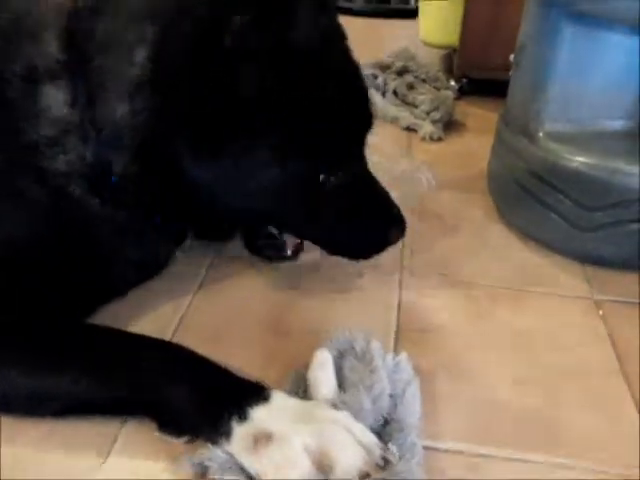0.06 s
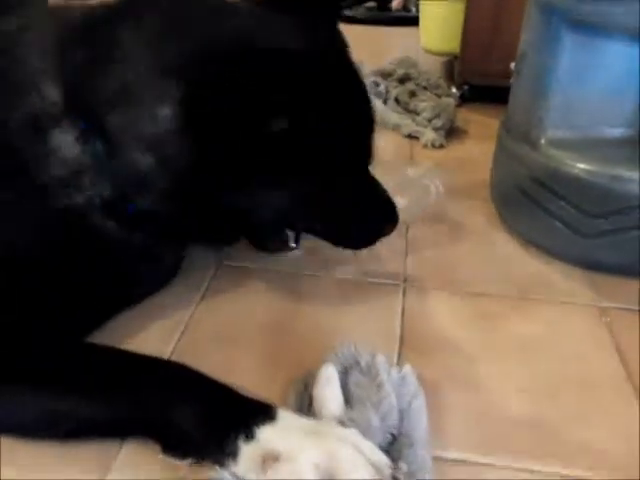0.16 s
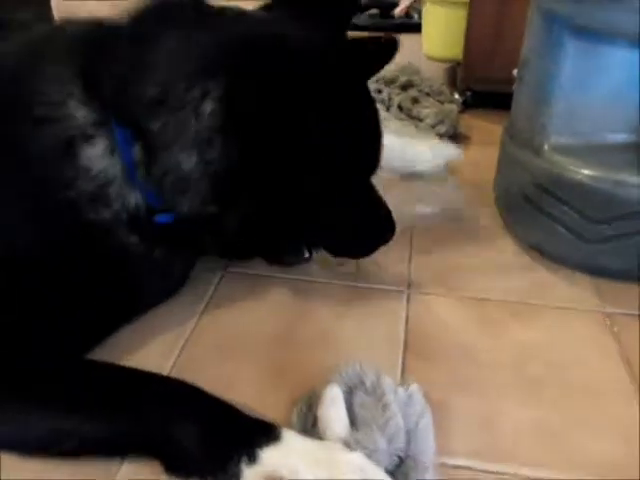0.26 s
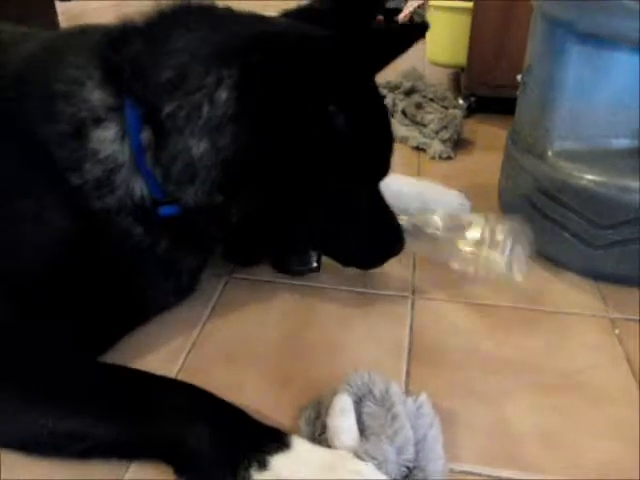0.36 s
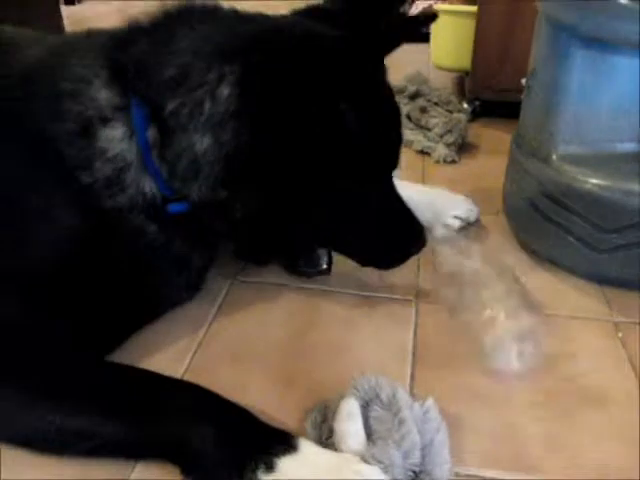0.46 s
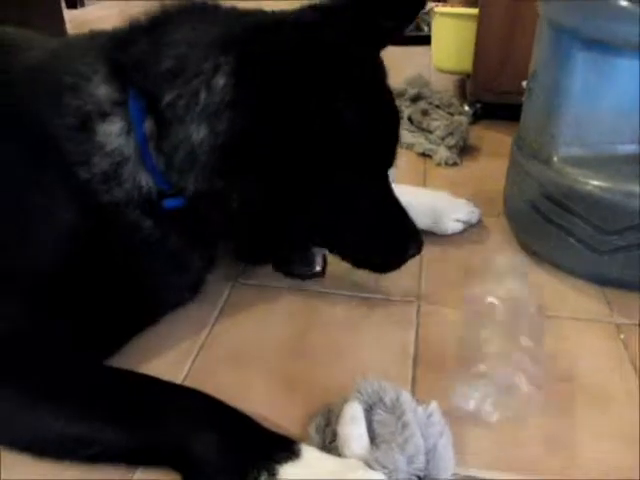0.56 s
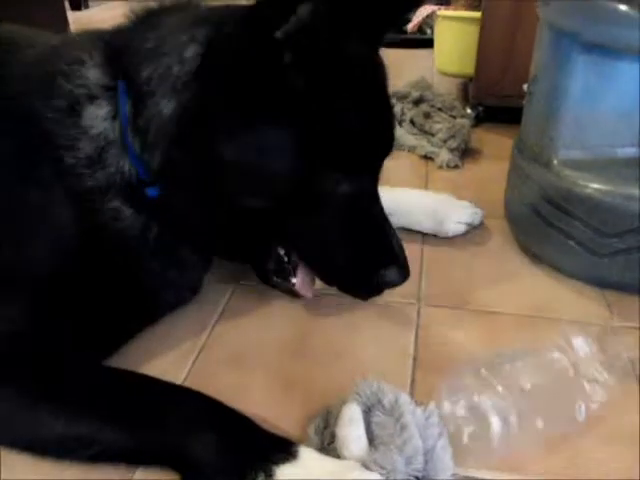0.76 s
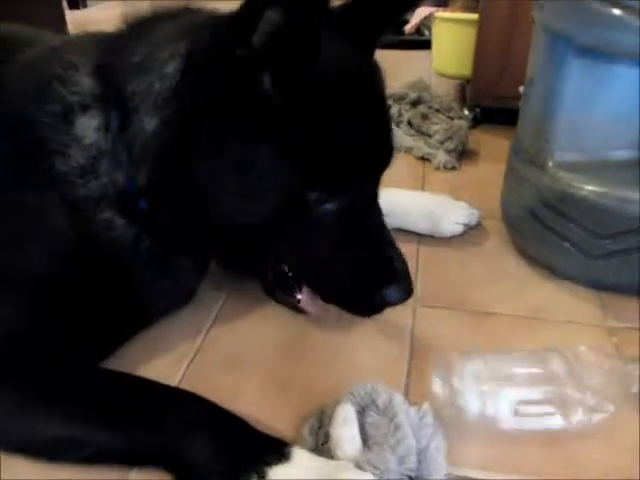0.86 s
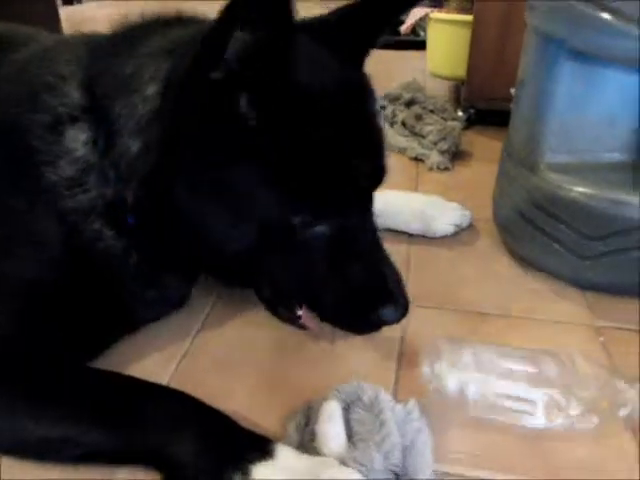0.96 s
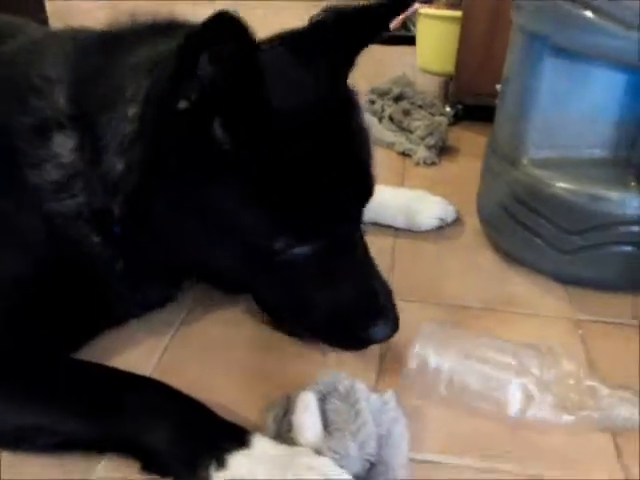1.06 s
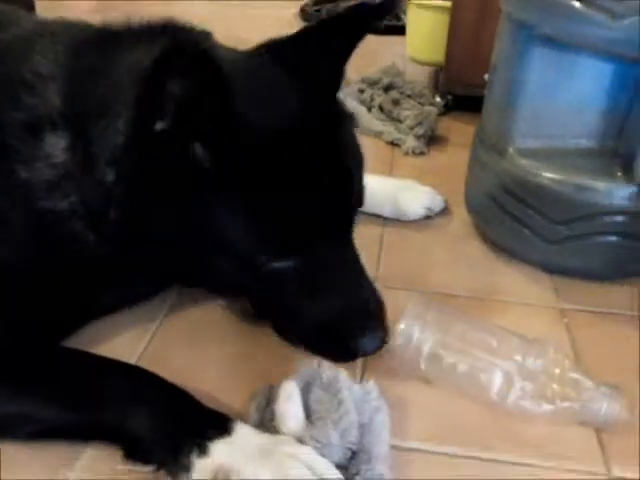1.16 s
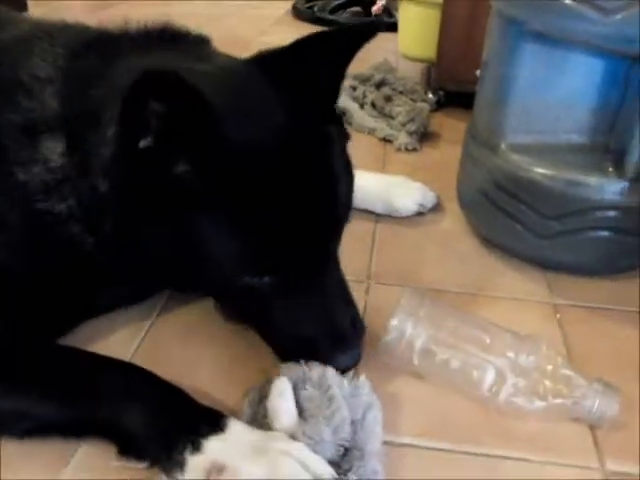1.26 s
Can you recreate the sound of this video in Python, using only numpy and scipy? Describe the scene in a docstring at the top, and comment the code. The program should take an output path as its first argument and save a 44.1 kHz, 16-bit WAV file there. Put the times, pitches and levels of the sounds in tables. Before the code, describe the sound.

A hollow plastic bottle clatters across a tiled floor with crinkly bounces, then settles.

```python
"""An empty plastic bottle slips from a dog's jaws, bounces end over end on tiles and rattles to rest.
Each bounce thuds, rings the thin wall and sets the air inside humming.
The plastic rustles through the teeth, crinkles between bounces and squeaks where it rubs.
A small hard room echoes it over a quiet hiss."""
import sys
import numpy as np
from scipy import signal
from scipy.io import wavfile
from scipy.ndimage import uniform_filter1d

SR = 44100
rng = np.random.default_rng(int(sys.argv[2]) if len(sys.argv) > 2 else 0)


def store_pcm(level_fs):
    """Save levels as 16-bit WAV."""
    pcm = np.round(np.clip(level_fs, -1, 1) * 32767).astype(np.int16)
    wavfile.write(sys.argv[1], SR, np.atleast_2d(pcm).T)


N = 57330
T = np.arange(N) / SR
HIT_T = T[:SR // 8]   # the time axis of one short hit
EDGES_HZ = np.geomspace(28, 18000, 29)
BANDS_HZ = np.sqrt(EDGES_HZ[1:] * EDGES_HZ[:-1])

# Table levels are relative. A fade_s is the time a sound takes to drop by 60 dB.
# The bottle's hits on the floor:
# start_s, thud_db, wall_db, crack_db, tick_db, panel_hz, panel_db, air_db
BOUNCES = [(0.2184, -20, -4.5, -12, -8, 1524, 3, -48), (0.28, -21.5, -14.5, -18.5, -31, 1740, -6.5, -32.5),
           (0.3212, -31, -15.5, -27.5, -33, 1350, -17, -53), (.3422, -26.5, -15, -17, -25.5, 1055, -8, -45),
           (.3790, -21, -15.5, -28, -53, 1340, -20, -25.5), (0.4419, -20, -13, -19.5, -20, 1607, -14, -28),
           (0.514, -27, -26.5, -12, -27.5, 1130, -15, -56),
           (0.5734, -20, -12.5, -15, -29.5, 1280, -33, -23), (0.605, -52, -25, -24, -24.5, 2200, -8, -53),
           (0.642, -22, -24.5, -5, -18.5, 2920, -14.5, -29.5),
           (.7140, -38.5, -32, -20.5, -30.5, 1067, -34, -24.5),
           (0.758, -26, -27, -31, -39, 1724, -20.5, -36), (.7780, -58, -19.5, -24, -35, 1280, -34, -45),
           (0.8167, -46, -20, -20.5, -40.5, 1370, -20.5, -28),
           (.8695, -45, -50, -48, -64, 1320, -25.5, -26.5),
           (0.8937, -35.5, -34, -24, -44.5, 1287, -19.5, -41),
           (1.082, -54, -42.5, -40, -52, 3460, -62, -41.5)]
# The centres of a hit's four pitch zones: thud_hz, wall_hz, crack_hz, tick_hz
ZONES_HZ = [400, 1400, 3800, 7500]
# How long the wall crackles: pitch_hz, fade_s
CRACKLE_FADES = [(200, 0.04), (1200, 0.056), (3500, 0.025), (12000, .015)]


def from_db(db):
    """Turn decibels into a gain."""
    return 10 ** (np.asarray(db) / 20)


def rms_one(x):
    """Scale a signal to an average strength (rms) of 1."""
    return x / np.sqrt(np.mean(x ** 2) + 1e-20)


def at_hz(points, hz):
    """Read between the rows of a table, on a scale of octaves."""
    pitches, values = np.transpose(points)
    return np.interp(np.log(hz), np.log(pitches), values)


def fade(t, fade_s):
    """Die away by 60 dB every fade_s."""
    return np.exp(-np.log(1000) * t / max(fade_s, 1e-3))


def swell(t, rise_s):
    """Rise softly from 0 towards 1."""
    return 1 - np.exp(-t / max(rise_s, 1e-5))


def add(out, start_s, sound):
    """Mix a sound in at its start time."""
    i = max(int(start_s * SR), 0)
    out[i:i + len(sound)] += sound[:N - i]


def noise_bands():
    """Separate noises, each a third of an octave wide and equally strong."""
    bands = []
    for edges in zip(EDGES_HZ, EDGES_HZ[1:]):
        band_pass = signal.butter(2, edges, "band", fs=SR, output="sos")
        band = signal.sosfilt(band_pass, rng.standard_normal(N + SR // 4))
        bands.append(rms_one(band[-N:]))
    return np.array(bands)


def background():
    """A quiet, steady hiss."""
    # The hiss in each band: pitch_hz, level_db
    hiss_levels = [(30, -77), (100, -78), (240, -71), (500, -59), (1000, -71), (2200, -73.5), (4500, -74.5),
                   (6600, -66), (9000, -79.5), (15000, -76)]
    return from_db(at_hz(hiss_levels, BANDS_HZ)) @ noise_bands()


def room_echo(sound, rise_s=0.0041):
    """Reflections from hard walls blur into a tail whose highest treble dies first."""
    # The strength of the echo: pitch_hz, level_db
    echo_levels = [(150, -18), (350, -5.5), (700, -8.5), (1200, -6.5), (2000, -13), (4000, -17.5),
                   (7000, -10.5), (15000, -9.5)]
    # The length of the echo: pitch_hz, fade_s
    echo_fades = [(200, 0.2), (1000, 0.36), (4000, .45), (14000, 0.12)]
    response = 0
    for band, hz, width_hz in zip(noise_bands(), BANDS_HZ, np.diff(EDGES_HZ)):
        tail = rms_one(band * swell(T, rise_s) * fade(T, at_hz(echo_fades, hz)))
        response += tail * np.sqrt(2 * width_hz / SR / N) * from_db(at_hz(echo_levels, hz))
    return signal.fftconvolve(sound, response)[:N]


def squeaks(wobble_per_khz=0.024):
    """Sliding plastic makes short wavering tones; higher ones are rougher."""
    # The rubs: start_s, length_s, start_hz, end_hz, level_db
    rubs = [(0.183, 0.028, 2017, 1737, -30), (.922, 0.053, 548.6, 531, -32.5)]
    out = np.zeros(N)
    for start_s, length_s, start_hz, end_hz, db in rubs:
        n = int(length_s * SR)
        wobble = rms_one(uniform_filter1d(rng.standard_normal(N), size=60))[:n]
        hz = np.linspace(start_hz, end_hz, n) * (1 + wobble_per_khz * start_hz / 1e3 * wobble)
        tone = np.sin(2 * np.pi * np.cumsum(hz) / SR)
        add(out, start_s, from_db(db) * signal.windows.tukey(n) * tone)
    return out


def light_touches(noise, levels, colour, touches_per_s=250):
    """Random taps on the wall, each dying like a small bounce."""
    taps = (rng.random(N) < touches_per_s / SR) * rng.exponential(1, N)
    out = 0
    for band, hz in zip(noise, BANDS_HZ):
        kept_per_sample = fade(2 / SR, at_hz(CRACKLE_FADES, hz))
        energy = signal.lfilter([1], [1, -kept_per_sample], taps + 1e-18)
        out += band * rms_one(np.sqrt(energy)) * from_db(at_hz(colour, hz))
    return out * from_db(np.interp(T, *np.transpose(levels)))


def rustle(noise):
    """The bottle brushes the dog's teeth as it slips out."""
    # The course of the slip: time_s, level_db
    slip_levels = [(0, -36), (.03, -45), (.08, -38.5), (.13, -63), (.16, -66), (.22, -45.5), (.26, -100)]
    # Its tone colour: pitch_hz, level_db
    slip_colour = [(120, -8.5), (220, -21.5), (450, 1), (650, -8.5), (1100, -8.5), (1600, -1), (2600, -12),
                   (3900, -3.5), (6600, -6.5), (15000, -29.5)]
    return light_touches(noise, slip_levels, slip_colour)


def rattle(noise):
    """The bottle scuffs and rocks on the tiles."""
    # The course of the rattle: time_s, level_db
    rattle_levels = [(.22, -37.5), (0.253, -21.5), (.33, -32), (.55, -37), (.70, -33.5), (.80, -33.5),
                     (0.931, -30), (1.0, -47.5), (1.3, -66)]
    # Its tone colour: pitch_hz, level_db
    rattle_colour = [(130, -43), (230, -11.5), (420, -16), (650, -32.5), (1100, -11), (1600, -13),
                     (2200, -13), (2800, -8), (3800, -15), (6600, -24.5), (9000, -48.5), (15000, -42.5)]
    return light_touches(noise, rattle_levels, rattle_colour)


def long_ring(hz, fade_s, blows, rise_s=0.0025, flutter=0.15, flutter_s=0.05):
    """A slightly fluttering tone that gains energy from each blow (start_s, level_db)."""
    energy = np.zeros(N)
    for start_s, db in blows:
        add(energy, start_s, (from_db(db) * swell(T, rise_s) * fade(T, fade_s)) ** 2)
    window = np.hanning(int(flutter_s * SR))
    level_drift, phase_drift = (flutter * rms_one(signal.fftconvolve(white, window, "same"))
                                for white in rng.standard_normal((2, N)))
    phase = 2 * np.pi * np.cumsum(hz * np.ones(N)) / SR
    return np.sqrt(energy) * ((1 + level_drift) * np.sin(phase) + phase_drift * np.cos(phase))


def air_hum(start_hz=211.6, climb_hz_per_s=20):
    """Each bounce sets the air in the bottle humming through its neck."""
    blows = [(0, -34.5)] + [(start_s, air_db) for start_s, *_, air_db in BOUNCES]
    return from_db(-0.5) * long_ring(start_hz + climb_hz_per_s * T, fade_s=0.42, blows=blows)


def low_rings():
    """Blows on the wall feed long low tones, already sounding from the jaws at the start."""
    # The low tones of bottle and room: pitch_hz, level_db, fade_s
    low_tones = [(398.2, -14.5, 0.47), (487.6, -23, 0.63), (525.3, -16, 0.16), (718, -22.5, 0.44),
                 (758, -26.5, 0.55)]
    blows = [(0, -15)] + [(start_s, wall_db) for start_s, _, wall_db, *_ in BOUNCES]
    return sum(from_db(db) * long_ring(hz, fade_s, blows) for hz, db, fade_s in low_tones)


def crackle(noise, colour, hold_s=0.0015, rise_cycles=1.5):
    """The thin wall's many short tones blur into a burst: a brief hold, then the treble dies first."""
    # The crackle in each band: pitch_hz, level_db
    crackle_levels = [(130, -29), (300, -13.5), (620, -22.5), (1100, -15.5), (2000, -11.5), (2700, -10.5),
                      (4000, -5.5), (6600, -5.5), (9000, -22), (15000, -28)]
    offset = rng.integers(N - len(HIT_T))
    after_hold = np.maximum(HIT_T - hold_s, 0)
    out = 0
    for band, hz in zip(noise, BANDS_HZ):
        onset = swell(HIT_T, min(rise_cycles / hz, hold_s))
        shape = onset * fade(after_hold, at_hz(CRACKLE_FADES, hz))
        burst = rms_one(band[offset:offset + len(HIT_T)] * shape) * np.sqrt(np.mean(shape ** 2))
        out += burst * from_db(at_hz(crackle_levels, hz) + at_hz(colour, hz))
    return out


def crinkles(noise):
    """The thin wall gives small bright snaps."""
    # The snaps: start_s, crack_db, tick_db
    wall_snaps = [(0.0405, -36, -30), (0.0555, -19, -40), (0.076, -43, -18), (0.117, -28, -24.5),
                  (0.178, -15, -28.5), (0.2492, -1.5, -39), (0.2553, -8, -14), (0.2662, -3, -19),
                  (0.2861, -13, -14.5), (0.2864, -20, -25.5), (0.2982, -16, -26), (0.3825, -11, -26),
                  (0.404, -24.5, -26), (0.4986, -11, -31.5), (0.5607, -21, -24), (0.6198, -8, -23.5),
                  (0.6694, -19.5, -54), (0.7397, -18, -33), (0.8808, -33, -43), (0.9665, -19, -41)]
    out = np.zeros(N)
    for start_s, crack_db, tick_db in wall_snaps:
        zones_db = [crack_db - 19.5, crack_db - 11.5, crack_db - 13, tick_db]
        colour = list(zip(ZONES_HZ, zones_db)) + [(14000, tick_db - 6)]   # duller above the tick
        add(out, start_s, crackle(noise, colour))
    return out * from_db(-2)


def ping(hz, db, fade_s, rise_s):
    """One tone of the struck plastic swells and dies away."""
    return from_db(db) * np.sin(2 * np.pi * hz * HIT_T) * swell(HIT_T, rise_s) * fade(HIT_T, fade_s)


def wall_ring(colour, detune=0.012, scatter_db=4.5):
    """The whole wall rings, with slightly different pitches and levels on every hit."""
    # The wall's natural tones: pitch_hz, level_db, fade_s
    wall_tones = [(371.6, 5, 0.057), (518, -8, 0.059), (699.6, -7, 0.073), (1010.6, 0.5, 0.041),
                  (1115, -4.5, 0.048), (1290, -8, 0.089), (1640, -15, 0.016), (1746, 1.5, 0.023),
                  (2037, -0.5, 0.033), (2326, 0, 0.043), (3078, 4.5, .02), (3730, -1, 0.0091),
                  (4034, 4, 0.018)]
    out = 0
    for k, (hz, db, fade_s) in enumerate(wall_tones):
        hit_hz = hz * (1 + detune * rng.normal())
        hit_db = db - 1.5 + at_hz(colour, hz) + scatter_db * rng.normal()
        out += (-1) ** k * ping(hit_hz, hit_db, fade_s, rise_s=0.0035)   # neighbours start opposite
    return out


def bounces(noise, panel_fade_cycles=39):
    """Each bounce thuds, crackles and rings the wall, most of all the panel that meets the floor."""
    # The tones of the struck panel: pitch_ratio, level_db
    panel_tones = [(0.618, -6), (1.002, 2.5), (1.3, -0.5)]
    out = np.zeros(N)
    for start_s, *zones_db, panel_hz, panel_db, _ in BOUNCES:
        colour = list(zip(ZONES_HZ, zones_db))
        panel = sum(ping(panel_hz * ratio, panel_db + db, panel_fade_cycles / panel_hz, rise_s=0.0028)
                    for ratio, db in panel_tones)
        thud = ping(hz=328, db=zones_db[0] + 3.5, fade_s=0.022, rise_s=0.0026)
        add(out, start_s, wall_ring(colour) + panel + thud + crackle(noise, colour))
    return out


def scene(low_cut_hz=170):
    """The bottle, too small to give off deep bass, in the room over a quiet background."""
    noise = noise_bands()
    bottle = bounces(noise) + crinkles(noise) + rattle(noise) + rustle(noise) + squeaks()
    bottle = signal.sosfilt(signal.butter(3, low_cut_hz, "high", fs=SR, output="sos"), bottle)
    return (background() + bottle + room_echo(bottle) + air_hum() + low_rings())[None]


def record(dry, high_cut_hz=15900):
    """The microphone weakens a few narrow bands; the loudest peaks clip and the top is cut."""
    # The weakened bands: pitch_hz, width_hz, level_db
    mic_dips = [(2720, 510, -31), (4960, 1350, -13.5), (5630, 900, -12.5), (7820, 850, -9.5)]
    for hz, width_hz, db in mic_dips:
        band = signal.lfilter(*signal.iirpeak(hz, hz / width_hz, fs=SR), dry)
        dry = dry - (1 - from_db(db)) * band
    low_pass = signal.ellip(10, 0.1, 70, high_cut_hz, fs=SR, output="sos")
    return signal.sosfilt(low_pass, np.clip(dry, -1, 1))


dry = scene()
out = record(dry)
store_pcm(out)
```